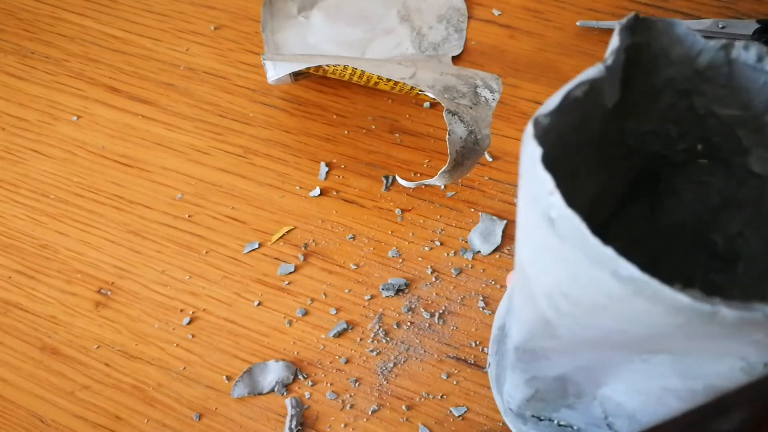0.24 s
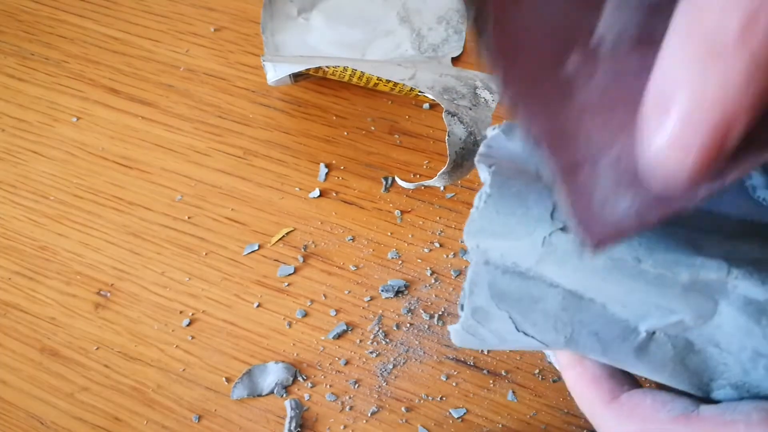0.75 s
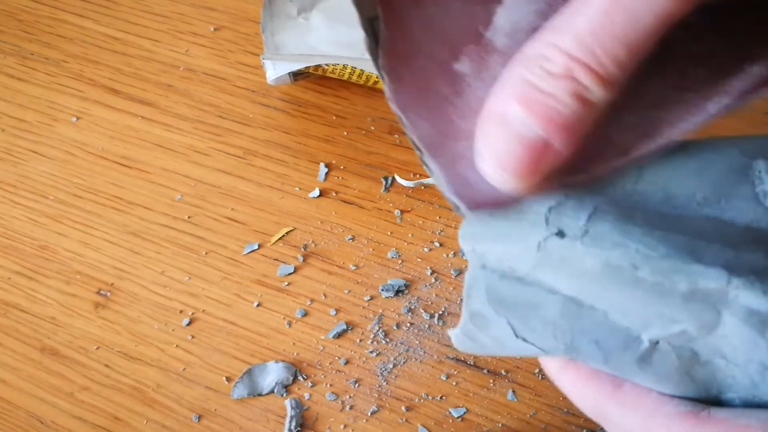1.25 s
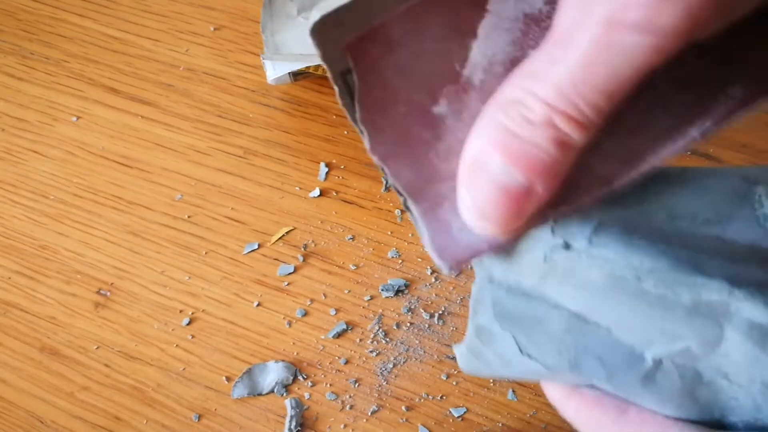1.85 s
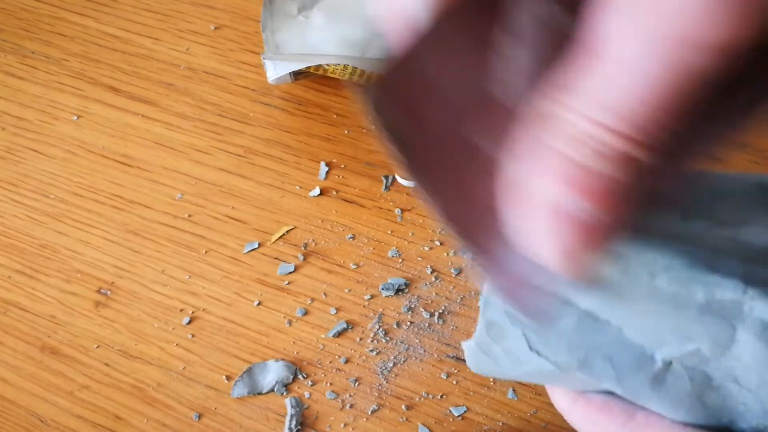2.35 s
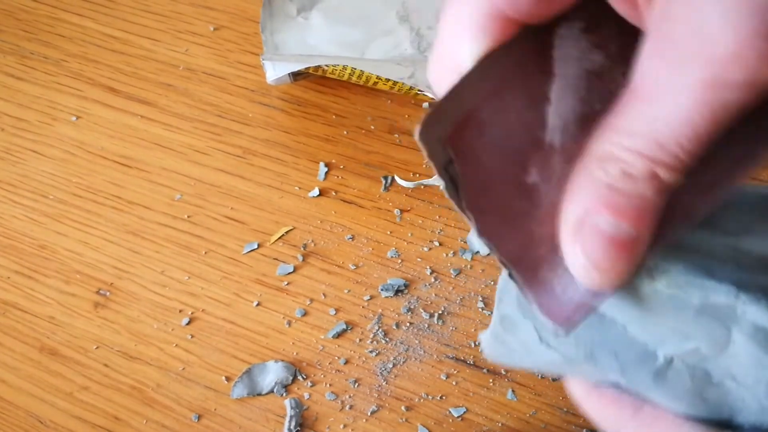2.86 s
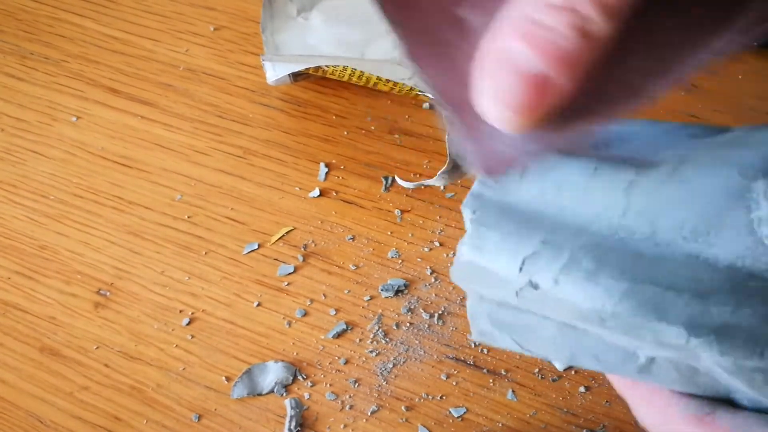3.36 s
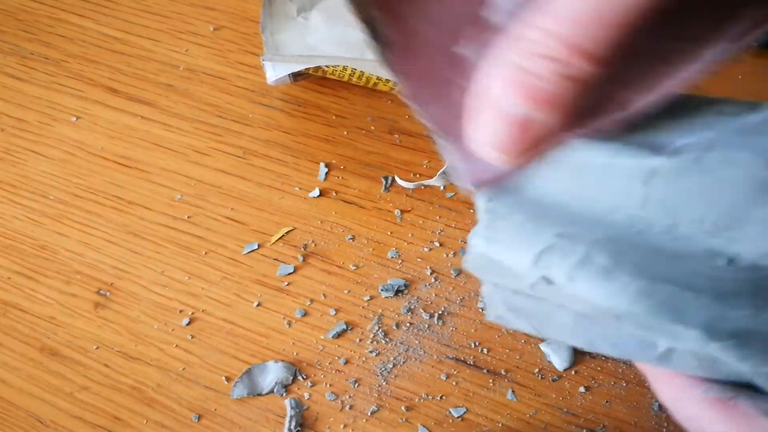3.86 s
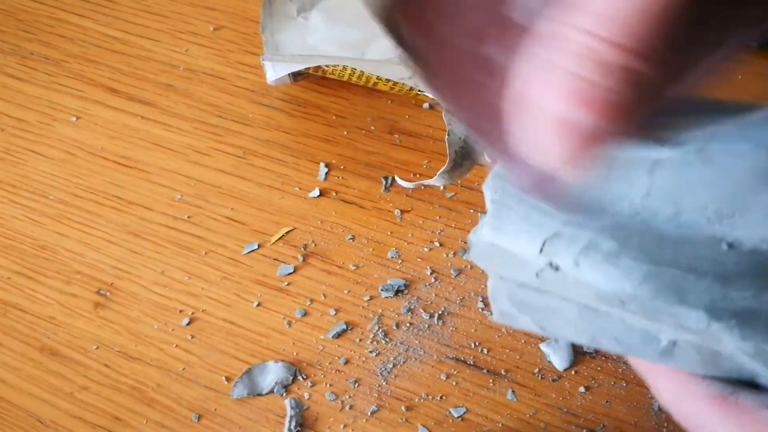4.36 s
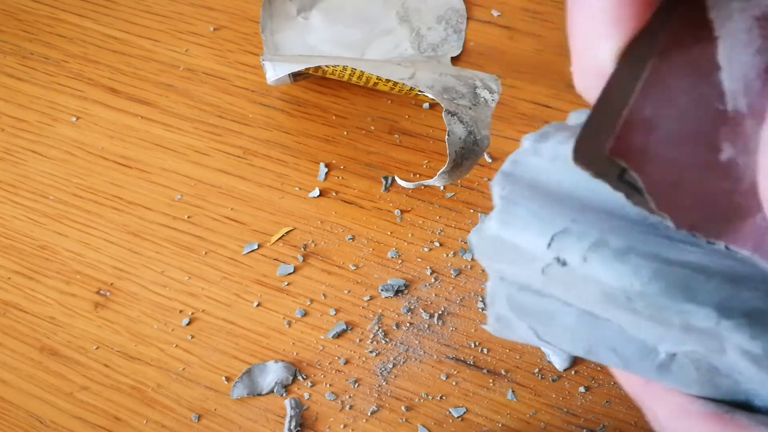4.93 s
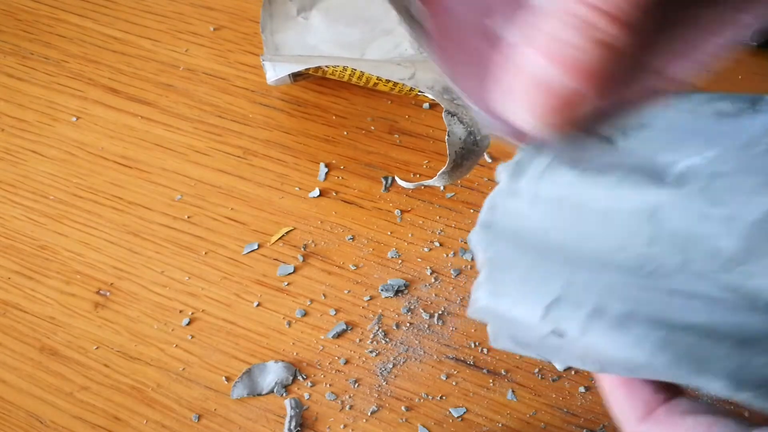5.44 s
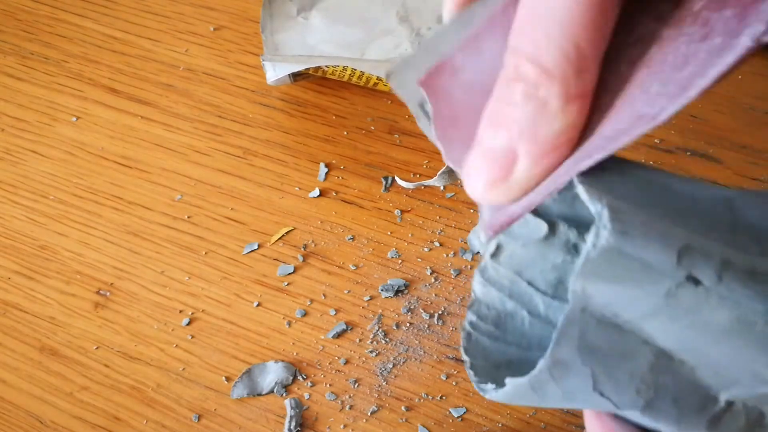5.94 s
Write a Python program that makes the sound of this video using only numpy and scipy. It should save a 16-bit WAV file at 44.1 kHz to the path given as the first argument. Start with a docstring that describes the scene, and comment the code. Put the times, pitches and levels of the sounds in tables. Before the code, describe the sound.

Sandpaper rubs rapidly back and forth over a small cement pot, close up in a small room, with tiny gritty cracks.

```python
"""A small room with a faint mains hum: close to a stereo microphone, sandpaper is rubbed quickly to and
fro over a small hand-held cement pot. Grit catches and lets go in dense tiny snaps that the stiff sheet
radiates; now and then a crumb cracks off or an edge bites. In the last strokes the pot's mouth turns to
the microphone and its hollow rings. The room answers each stroke."""
import sys
import numpy as np
from scipy import signal
from scipy.fft import rfft, irfft, next_fast_len
from scipy.io import wavfile

SR = 44100
rng = np.random.default_rng(int(sys.argv[2]) if len(sys.argv) > 2 else 0)


def bounce(signal):
    """Save signal as a 16-bit WAV file at the path given by the first command-line argument."""
    frames = np.transpose(np.atleast_2d(signal))
    limited = np.clip(frames, -1, 1)
    pcm = np.round(limited * 32767).astype(np.int16)
    wavfile.write(sys.argv[1], SR, pcm)


N = 273420
TIME = np.arange(N) / SR
TAPS = 2048
FREQ = np.maximum(np.arange(TAPS // 2 + 1) * SR / TAPS, 1)  # Hz axis of the sheet's EQ curves


def undb(db):
    """Decibels to gain."""
    return 10 ** (np.asarray(db) / 20)


def unit(x):
    """Scale to rms 1."""
    return x / np.sqrt(np.mean(x ** 2))


def along(hz, points, column=1):
    """Read (Hz, value) points on a log-frequency axis."""
    points = np.array(points, float)
    return np.interp(np.log(hz), np.log(points[:, 0]), points[:, column])


def bell(hz, octaves):
    """An EQ bell of height 1 on FREQ."""
    return np.exp(-.5 * (np.log2(FREQ / hz) / octaves) ** 2)


def response(db):
    """Minimum-phase impulse responses for EQ curves on FREQ, at a mean energy of 1."""
    cepstrum = irfft(np.log(undb(db)))
    cepstrum[:, 1:TAPS // 2] *= 2
    cepstrum[:, TAPS // 2 + 1:] = 0
    return unit(irfft(np.exp(rfft(cepstrum)))) / np.sqrt(TAPS)


def add(out, sound, start_s):
    """Mix a stereo sound in at a time."""
    i = max(int(start_s * SR), 0)
    out[:, i:i + sound.shape[1]] += sound[:, :max(N - i, 0)]


def wander(size, rate_hz):
    """Smooth random drift with a spread of about 1."""
    knots = rng.standard_normal(4096)
    return 1.078 * np.interp(np.arange(size) * rate_hz / SR, np.arange(len(knots)), knots)


def stereo_image(pair, likeness):
    """Blend two unrelated sounds into left and right, following (Hz, correlation) points."""
    size = next_fast_len(pair.shape[1] + 256)
    hz = np.maximum(np.arange(size // 2 + 1) * SR / size, 1)
    correlation = np.clip(along(hz, likeness), -.98, .98)
    mid, side = rfft(pair, size) * np.sqrt([(1 + correlation) / 2, (1 - correlation) / 2])
    return irfft(np.array([mid + side, mid - side]), size)[:, :pair.shape[1]]


def room_tone(air_db=-69.5):
    """A bed of soft air noise, nearly mono in the bass, and a wavering appliance hum."""
    # spectrum of the air: f/Hz, relative level/dB
    air_colour = [(25, -1.5), (60, -1.5), (100, -0.5), (180, -4), (250, 1), (330, -3), (500, -11.5),
                  (610, -6.5), (850, -11), (3000, -12.5), (7000, -17), (9000, -16), (11000, -20.5),
                  (15500, -26)]
    # partials of the hum: f/Hz, level/dB
    hum_partials = [(49, -92.5), (99.6, -81.5), (146.7, -82), (241, -82), (294, -86.5), (393, -91.5),
                    (733, -86.5)]
    hz = np.maximum(np.arange(N // 2 + 1) * SR / N, 1)
    air = irfft(rfft(rng.standard_normal((2, N))) * undb(along(hz, air_colour)), N)
    hum = sum(undb(db + wander(N, 15)) * unit(np.sin(2 * np.pi * f * TIME + 0.5 * wander(N, 5.3)))
              for f, db in hum_partials)
    return undb(air_db) * unit(stereo_image(air, [(80, 0.8), (400, 0.254), (2000, 0.14)])) + hum


def grit(size, grains_per_s=18000, spread_db=0.5):
    """Grains catch at random, a few of them hard; the sheet judders and meets rough and smooth patches."""
    catches = rng.random(size) < grains_per_s / SR
    strength = undb(spread_db * np.minimum(rng.exponential(size=size), 4))
    judder_db = 0.29 * wander(size, rate_hz=330)
    patches_db = 1.7541 * wander(size, rate_hz=75)
    return unit(catches * strength * undb(judder_db + patches_db) * rng.standard_normal((2, size)))


def sheet(force, eq_db):
    """The sheet radiates the grit's snaps; its parts move unevenly, so left and right partly differ."""
    # spectrum of the rubbed sheet: f/Hz, left level/dB, right level/dB
    paper_colour = [(152.4, -51.5, -41), (446, -27, -26.5), (858.5, -18, -25.5), (925, -16.5, -18.5),
                    (1194, -13.5, -17), (1260, -18.5, -18.5), (2243, -14, -14.5), (2617, -11.5, -14),
                    (3726, -10, -9.5), (6235, -6, -4.5), (6900, -4, -3.5), (8963, 1.5, 2),
                    (10347, -1, -6.5), (11870, -6.5, -15), (16750, -19.5, -20)]
    # stereo image: f/Hz, correlation
    likeness = [(400, 0.892), (700, 0.08), (1100, 0.926), (2300, 0.632), (4200, 0.032),
                (6000, -0.285), (7500, 0.36), (9200, 0.982), (11000, 0.37)]
    colour_db = np.array([along(FREQ, paper_colour, column) for column in (1, 2)])
    return signal.fftconvolve(stereo_image(force, likeness), response(colour_db + eq_db), axes=1)


def dragging(db=-50):
    """While the hand turns round, the sheet stays on the pot and a few loose grains crunch under it."""
    touching = np.interp(TIME, [.56, .58, 3.12, 3.17, 3.74, 3.78, 5.04, 5.06], [0, 1, 1, 0, 0, 1, 1, 0])
    crunch = grit(N, grains_per_s=1200, spread_db=7) * touching
    return undb(db) * sheet(crunch, 3 * bell(2030, 0.81))[:, :N]


def grip(start_s, db, firm_db=-28):
    """The grip sets a stroke's tone and pan; a light stroke leans from treble toward scrape and rasp."""
    # the shifting grip: t/s, scrape/dB, rasp/dB, hollow ring/dB, sheet resonance/Hz, left minus right/dB
    grips = [(.74, 6.5, 5.5, 0, 6500, -0.5), (.82, -2.5, 0, 3.5, 8480, 2.5), (1.25, -2, 5, 6.5, 8550, 2.5),
             (1.55, 1.5, 5.5, 3.5, 11000, 1.83), (2.1, 6.5, 4.5, 2.5, 11100, 1.45),
             (2.85, 7, 4.5, 3, 11200, 0.53), (3.1, 2, 5, 1.5, 10300, 1.06), (4.25, 1, 3, 2, 10430, 1.53),
             (4.45, 1.5, 2, 0, 6960, 1.5), (4.9, -4.5, -1.86, 1, 6930, 2), (5.3, -4, 0.5, 1, 6950, 1),
             (5.65, 4, 1, -1.5, 7210, -0.5), (6.1, 7, 1.5, -2.5, 6800, 0.5)]
    times, *columns = np.transpose(grips)
    scrape_db, rasp_db, hollow_db, sheet_hz, pan_db = (np.interp(start_s, times, c) for c in columns)
    light_db = np.clip(firm_db - db, 0, 16)
    return scrape_db + 0.323 * light_db, rasp_db + 0.17 * light_db, hollow_db, sheet_hz, pan_db


def stroke_eq(start_s, scrape_db, rasp_db, hollow_db, sheet_hz, mouth_turns_s=5.5):
    """A stroke's colour in dB: set by the grip, and by a bend of the sheet that is new every time."""
    # resonances and notches of the cupped sheet: f/Hz, width/octaves, weight
    cup_bands = [(2568, 0.1554, 0.91), (3917, 0.139, -1.29), (4346, 0.152, 0.274), (5475, 0.238, -0.68)]
    turned = start_s > mouth_turns_s  # the pot's mouth brings a higher scrape and more low rub
    scrape_hz = 1640 if turned else 958
    rub_db = -4 + 2.086 * scrape_db + 6.5 * turned
    body_db = rub_db * bell(280, 0.67) + scrape_db * bell(scrape_hz, 800 / scrape_hz)
    cup_db = hollow_db * sum(weight * bell(hz, octaves) for hz, octaves, weight in cup_bands)
    resonance_db = 2 * bell(sheet_hz, 0.13) - 2 * bell(1.653 * sheet_hz, 0.19)
    bend_db = 2.5 * np.interp(np.log2(FREQ), np.linspace(8, 14, 56), rng.standard_normal(56))
    return body_db + rasp_db * bell(3400, 0.764) + cup_db + resonance_db + bend_db


def stroke(start_s, length_s, db, attack_s=0.02512, release_s=0.02825, harsh_db=0, top_db=0, nudge_db=0):
    """The sheet speeds up, slides and stops, brightest where fastest; gives the sound and its cue time."""
    scrape_db, rasp_db, hollow_db, sheet_hz, pan_db = grip(start_s, db)
    lead_s = .04
    t = np.arange(int((length_s + 2 * lead_s) * SR)) / SR - lead_s
    travel = np.clip(2 * t / length_s - 1, -1, 1)
    speed = 1 - travel ** 2
    contact = np.clip(.5 + t / attack_s, 0, 1) * np.clip(.5 + (length_s - t) / release_s, 0, 1)
    sag_db = -1.48 * travel  # the push eases off
    swell_db = 3.5 * min(0.099 / length_s, 1) * (speed - 2 / 3)
    force = grit(len(t)) * contact * undb(db + sag_db + swell_db)
    late = np.clip(.5 + travel, 0, 1)  # the sheet bends into a new shape halfway
    hiss = bell(11900, 0.75)
    # slow ends, fast first half, fast second half: crossfade, sheet resonance/Hz, EQ/dB
    stages = [(1 - speed, 0.905 * sheet_hz, -6 * hiss - 4.5 * bell(4120, 1.0)),
              (speed * (1 - late), sheet_hz, 0.5 * hiss),
              (speed * late, sheet_hz, 0.5 * hiss)]
    sound = 0
    for share, hz, bright_db in stages:
        eq_db = stroke_eq(start_s, scrape_db, rasp_db + harsh_db, hollow_db, hz)
        sound = sound + sheet(force * share, eq_db + bright_db + top_db * bell(11700, 0.33))
    pan = undb(np.array([[1], [-1]]) * (pan_db + nudge_db) / 2)
    return sound * pan, start_s - lead_s


def sanding():
    """Runs of strokes; after a pause the sheet's tip lands abruptly: harsher, duller, further right."""
    # strokes, about nine a second in the fast runs: t/s, length/s, level/dB
    strokes = [(.571, 0.0547, -42), (0.636, 0.1174, -41), (0.764, 0.0814, -42.5), (.814, 0.0368, -29),
               (.846, .096, -36), (0.976, 0.0683, -30.5), (1.088, 0.0566, -30), (1.194, 0.0666, -29.5),
               (1.292, 0.0531, -31), (1.398, 0.0691, -30.5), (1.488, 0.0658, -29.5), (1.608, 0.0649, -30),
               (1.7, 0.0693, -30), (1.812, 0.0669, -29), (1.909, 0.0773, -29), (2.04, 0.0789, -29),
               (2.149, 0.0553, -29), (2.264, 0.0643, -30), (2.365, 0.067, -29.5), (2.483, 0.0721, -30),
               (2.589, 0.0678, -30.5), (2.709, 0.0704, -29), (2.814, 0.0738, -29), (2.951, 0.0681, -27.5),
               (3.071, 0.069, -26.5), (3.27, 0.043, -49.5), (3.328, 0.0857, -53.5), (3.455, 0.0948, -24.5),
               (3.641, 0.06, -59), (3.75, 0.0765, -26.5), (3.862, 0.073, -25.5), (3.966, 0.0654, -25),
               (4.077, 0.0765, -25.5), (4.179, 0.0694, -25.5), (4.29, 0.092, -26), (4.414, 0.0693, -25),
               (4.529, 0.0764, -23.5), (4.66, 0.0643, -25), (4.773, 0.0879, -26), (4.913, 0.1313, -25.5),
               (5.286, 0.1219, -26.5), (5.499, 0.098, -59), (5.638, .062, -27), (5.696, 0.0483, -38.5),
               (5.907, 0.0512, -27), (5.99, 0.03415, -28.5), (6.05, 0.0844, -53), (6.136, 0.0298, -47)]
    # short dabs as the tip lands again: t/s, length/s, level/dB
    landings = [(3.403, 0.0319, -36.5), (3.693, 0.0174, -33.5), (5.21, 0.0432, -36), (5.594, 0.038, -37),
                (5.826, .023, -41)]
    out = np.zeros((2, N))
    for start_s, length_s, db in strokes:
        add(out, *stroke(start_s, length_s, db))
    for start_s, length_s, db in landings:
        add(out, *stroke(start_s, length_s, db, attack_s=0.0068, harsh_db=0.5, top_db=-3.5, nudge_db=-2))
    return out


def pot(force):
    """The cement pot rings in its modes, each with its own phase left and right; too small for bass."""
    # modes of the pot: f/Hz, relative level/dB, t60/s
    modes = [(1184.5, 12.5, 0.0404), (1234.8, 3.5, 0.0794), (1636, 6.5, 0.0216), (1846, -0.5, 0.076),
             (1925.5, -5.5, 0.167), (3072, 7, 0.053), (3490, -9.5, 0.058), (3640, -2.5, 0.038),
             (4474, 14, 0.023), (4780, 10.5, 0.0324), (5250, 1, 0.034), (5360, -9, .025)]
    t = np.arange(SR // 4) / SR
    ring = 0
    for hz, db, t60 in modes:
        phase = rng.standard_normal((2, 1)) * hz / 5000  # low modes reach both sides nearly in step
        ring = ring + undb(db - 60 * t / t60) * np.cos(2 * np.pi * hz * t + phase)
    ring = signal.sosfilt(signal.butter(4, 950, "high", fs=SR, output="sos"), ring)
    return signal.fftconvolve(force, unit(ring) / np.sqrt(len(t)), axes=1)[:, :N]


def mouth_ring(rub):
    """Rubbing rings the pot; more of the ring reaches the microphone as the mouth turns to it."""
    # send into the pot's ring as its mouth turns: t/s, level/dB
    mouth_send = [(.6, -23), (1.0, -14), (3.1, -49.5), (5.3, -13), (5.62, -6), (5.95, -5.5), (6.2, -9)]
    return pot(rub * undb(np.interp(TIME, *np.transpose(mouth_send))))


def room(dry, early_db=-17, early_decay_s=0.0066, tail_db=-12.5, t60_s=0.4205):
    """Table and hands throw back quick reflections; the walls add a tail whose treble dies first."""
    t = np.arange(int(.8 * SR)) / SR
    tail = 0
    for low_hz, high_hz in [(100, 2000), (2000, 5000), (5000, 10000), (10000, 18000)]:
        band = signal.butter(3, [low_hz, high_hz], "band", fs=SR, output="sos")
        decay = undb(-60 * t * (1 + 0.58 * low_hz / 10000) / t60_s)
        tail = tail + signal.sosfilt(band, rng.standard_normal((2, len(t)))) * decay
    early = rng.standard_normal((2, len(t))) * np.exp(-t / early_decay_s) * (t > .002)
    echo = undb(tail_db) * unit(tail * (t > .008)) + undb(early_db) * unit(early)
    return signal.fftconvolve(dry, echo / np.sqrt(len(t)), axes=1)[:, :N]


def crumb_snaps(decay_s=0.00389, gain_db=3):
    """A crumb breaks off in a short crack that shakes both sheet and pot."""
    # crumbs that snap and edges that catch: t/s, level before gain/dB, send into the pot/dB
    snaps = [(0.596, -43, -10), (.705, -40.5, 0.5), (.764, -51.5, 8), (0.825, -38, -29.5),
             (.868, -32.5, -20), (0.983, -28, -20.5), (1.032, -27, -24), (1.613, -37.5, -17.5),
             (3.153, -37.5, -15), (3.7, -31, -28.5), (4.567, -33.5, -31), (5.03, -43.5, -22.5),
             (5.215, -36.5, -8), (5.679, -23, -9.5), (5.753, -41, -4.5), (5.764, -36, -5),
             (5.822, -34, -23), (5.936, -25.5, -7.5), (6.163, -38.5, -6), (6.185, -28, -8.5)]
    cracks, knocks = np.zeros((2, N)), np.zeros((2, N))
    fade = np.exp(-np.arange(SR // 50) / SR / decay_s)
    for start_s, db, send_db in snaps:
        burst = rng.standard_normal((2, len(fade))) * fade * undb(db + gain_db)
        add(cracks, sheet(burst, 5 * bell(2370, 1)), start_s)
        add(knocks, np.ones((2, 1)) * np.linalg.norm(burst[0]) * undb(send_db), start_s)
    return cracks + pot(knocks)


def edge_bites(relative_width=0.109):
    """A stiff edge bites the cement or catches on the rim, and grit shakes one narrow resonance of it."""
    # bites of the sheet's edge: centre t/s, length/s, f/Hz, level/dB
    bites = [(0.823, 0.04, 3950, -38.5), (1.506, .06, 4650, -33.5), (2.742, 0.062, 5310, -37),
             (3.102, 0.085, 4630, -34), (3.152, .02, 1260, -42), (3.485, 0.046, 4794, -28),
             (5.342, 0.17, 4490, -39.5), (5.399, 0.024, 1207, -48.5), (6.165, 0.01325, 1560, -41)]
    out = np.zeros((2, N))
    for centre_s, length_s, hz, db in bites:
        size = int(length_s * SR)
        band_hz = [hz * (1 - relative_width / 2), hz * (1 + relative_width / 2)]
        rasp = signal.sosfilt(signal.butter(1, band_hz, "band", fs=SR, output="sos"), grit(size))
        add(out, undb(db) * unit(rasp) * np.hanning(size), centre_s - length_s / 2)
    return out


def scene():
    """Rubbing, the pot's ring and snapping crumbs up close, with reverb and room tone behind."""
    rub = sanding() + dragging() + edge_bites()
    close = rub + mouth_ring(rub) + crumb_snaps()
    return close + room(close) + room_tone()


def record(dry, mute_from_s=.425, mute_to_s=.571, top_hz=15900):
    """The sound drops to silence briefly before the first stroke; the top is cut steeply."""
    live = (TIME < mute_from_s) | (TIME > mute_to_s)
    return signal.sosfilt(signal.ellip(10, .2, 80, top_hz, fs=SR, output="sos"), dry * live)


dry = scene()
out = record(dry)
bounce(out)
```